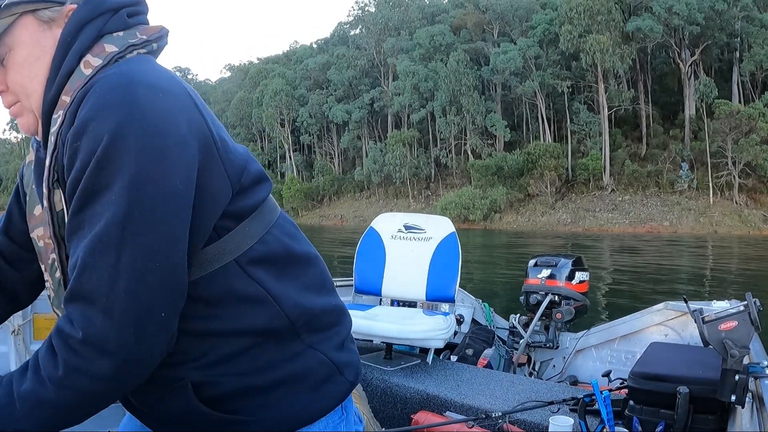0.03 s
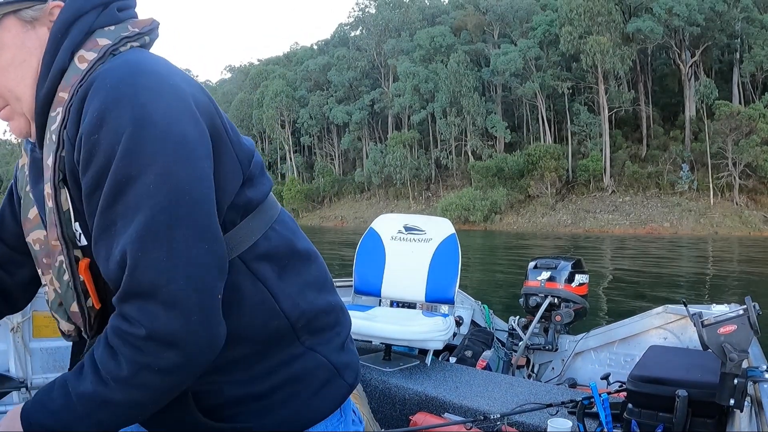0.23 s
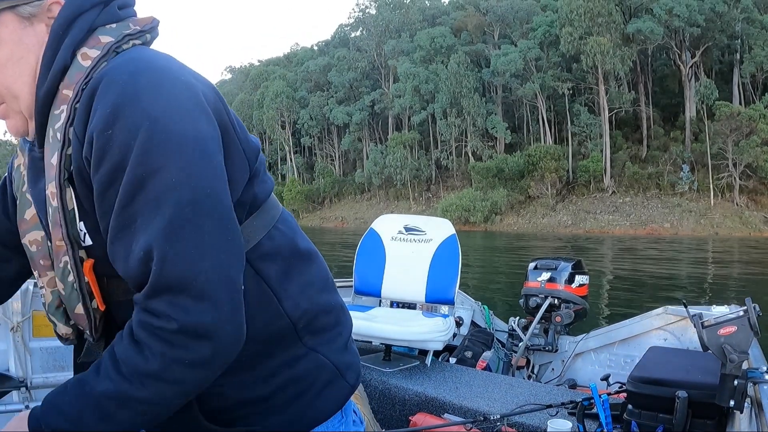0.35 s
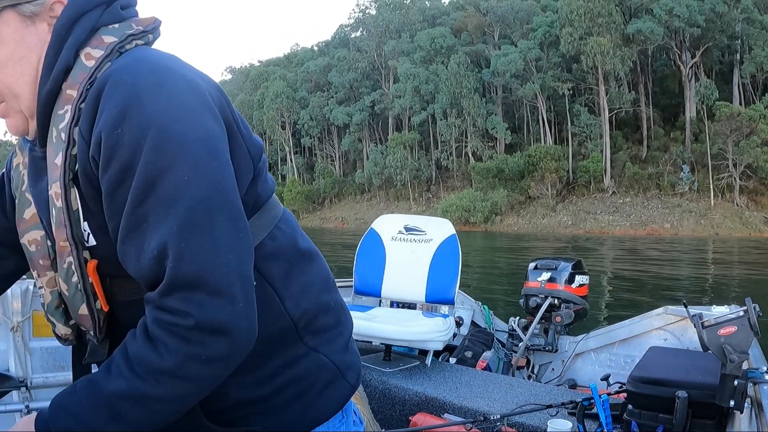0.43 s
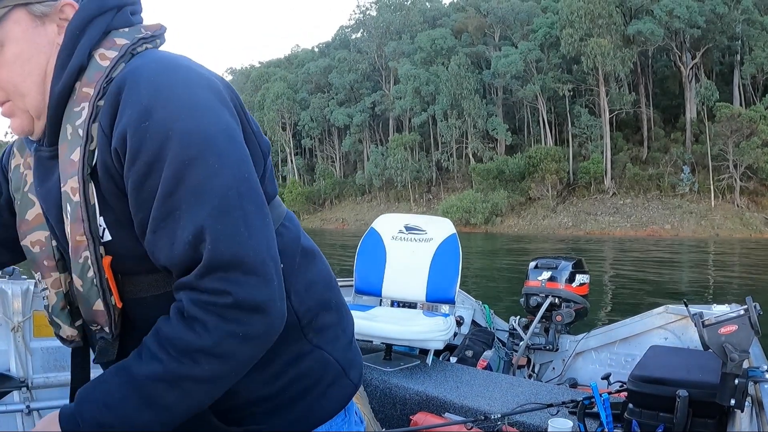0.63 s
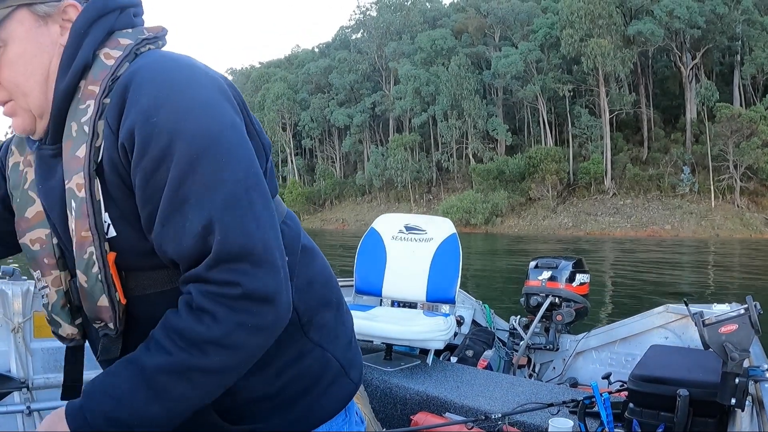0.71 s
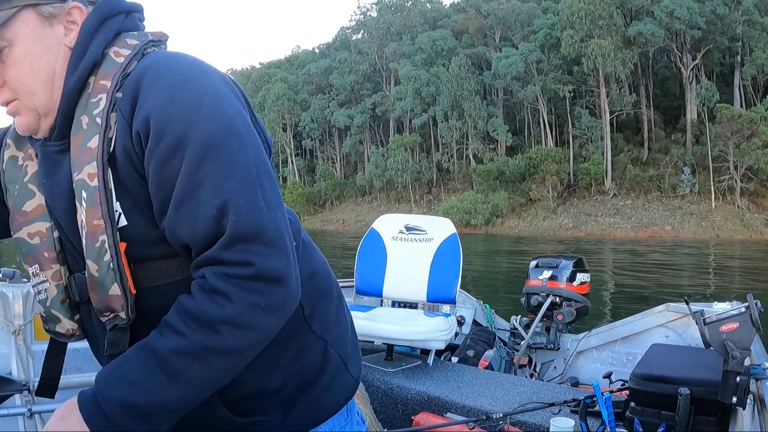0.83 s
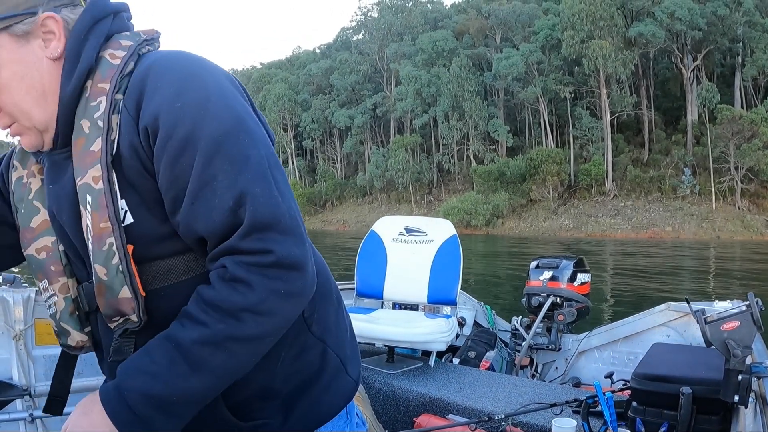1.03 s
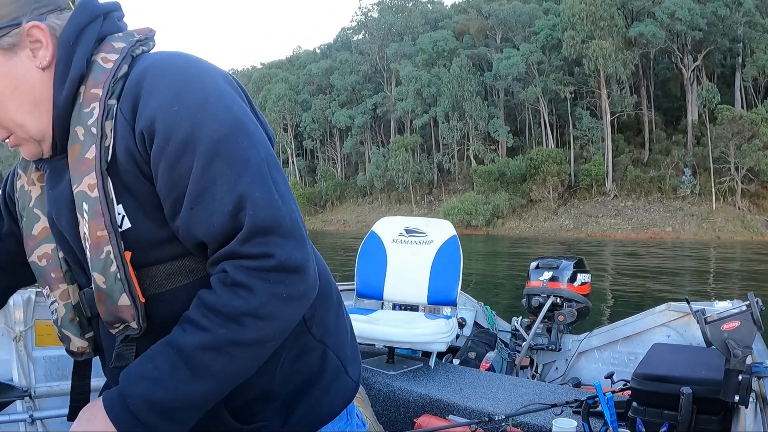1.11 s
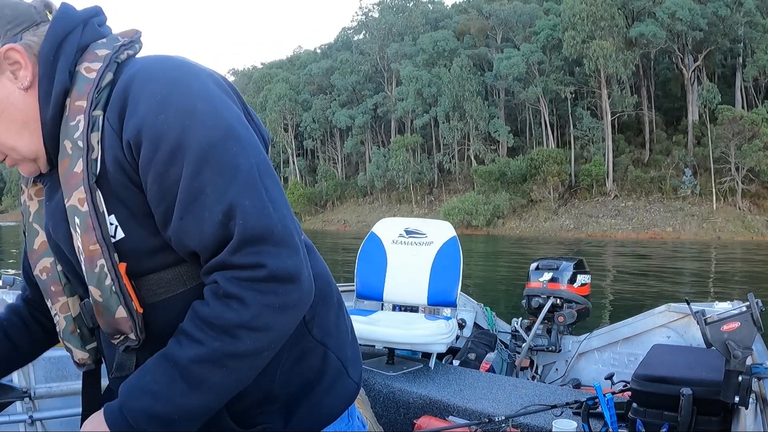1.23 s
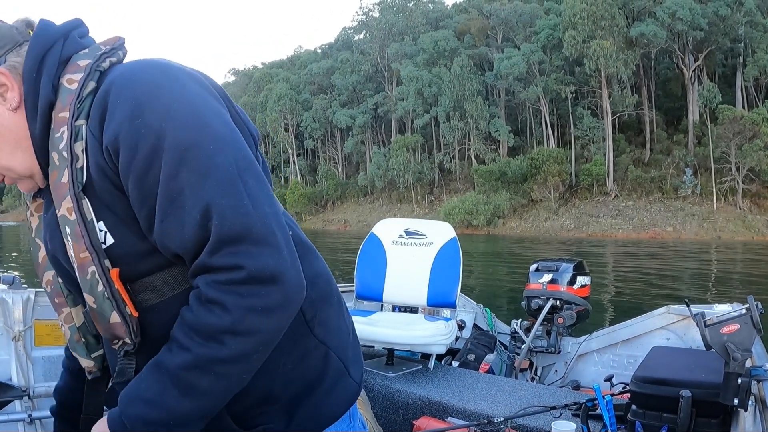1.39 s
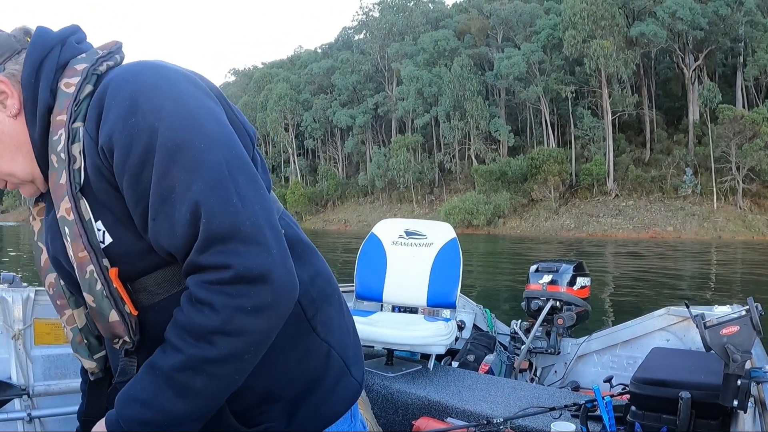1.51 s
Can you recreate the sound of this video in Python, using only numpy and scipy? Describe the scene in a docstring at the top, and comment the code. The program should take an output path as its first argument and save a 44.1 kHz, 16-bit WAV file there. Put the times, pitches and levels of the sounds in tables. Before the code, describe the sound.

Heavy gear thuds hard onto a small metal boat, followed by clattering, rubbing and dull knocks

```python
"""Heavy gear lands with one bang on the hull of a small aluminium boat; scuffs and clicks come first.
Lighter knocks and clatter follow: decaying sine modes and shaped noise sound the struck metal and the hull.
Rubbing strokes and scuffs are resonant noise with a rough level; creaks, hull hums and brief rings of
tapped gear are short wavering tones.
Steady coloured noise is the open air over still water; the close microphone overloads on the bang."""
import sys
import numpy as np
from scipy import signal
from scipy.fft import rfft, irfft, next_fast_len
from scipy.io import wavfile
from scipy.ndimage import map_coordinates

SR = 44100
rng = np.random.default_rng(int(sys.argv[2]) if len(sys.argv) > 2 else 0)


def generate_wav(sig):
    """Save sig (samples, or channels by samples) to the path in sys.argv[1] as 16-bit PCM at SR."""
    pcm = np.round(np.clip(np.atleast_2d(sig).T, -1, 1) * 32767).astype(np.int16)
    wavfile.write(sys.argv[1], SR, pcm)


N = 68355
T = np.arange(N) / SR  # seconds

# Spectrum of hard, light contacts. Each row: frequency in Hz, relative level in dB.
CLICK_COLOUR = [(60, -36.5), (200, 0), (500, 3.5), (1500, 0.5), (3000, -1.5), (4500, -7), (6500, -15),
                (8800, -30.5), (11500, -19), (13500, -45.5), (16000, -67.5)]
# Spectrum of dull blows on sheet metal. Each row: frequency in Hz, relative level in dB.
KNOCK_COLOUR = [(30, -58), (70, -15.5), (130, -23), (220, -2.5), (400, -6.5), (700, -11), (1100, -21),
                (2500, -36), (6000, -44.5), (12000, -99)]


def amp(db):
    """Level to amplitude: 20 dB is a factor of ten."""
    return 10 ** (np.asarray(db) / 20)


def unit(x):
    """Normalisation to unit effective (rms) value."""
    return x / np.sqrt(np.mean(x ** 2) + 1e-20)


def add(out, start_s, x):
    """Superposition: sounds add linearly from their start times on."""
    i = max(round(start_s * SR), 0)
    out[i:i + len(x)] += x[:N - i]


def wobble(rate):
    """Slow random modulation: a smooth curve through random knots, rate of them a second."""
    knots = rng.standard_normal(4096)
    return map_coordinates(knots, [T * rate], mode="wrap")


def noise(colour, ring_hz=1000, q=1, ring_db=-200, size=N):
    """Spectral shaping: noise of rms 1 takes a colour and, if wanted, the peak of one resonance."""
    f = np.fft.rfftfreq(size, 1 / SR) + 1  # the 1 Hz offset keeps the logarithm finite
    hz, db = np.transpose(colour)
    gain = amp(np.interp(np.log(f), np.log(hz), db))
    detuning = q * (f / ring_hz - ring_hz / f)
    gain = gain * np.sqrt(1 + amp(ring_db) ** 2 / (1 + detuning ** 2))
    return unit(irfft(rfft(rng.standard_normal(size)) * gain, size))


def fade(t60, attack, size=N):
    """Exponential damping: a quick rise, then a fall of 60 dB in t60 seconds."""
    t = T[:size]
    return amp(-60 * t / t60) * (1 - np.exp(-t / attack))


def ring(modes, attack, scatter_db, size=24000):
    """Modal superposition: damped sines, whose levels scatter from blow to blow."""
    out = np.zeros(size)
    for hz, db, t60 in modes:
        level = amp(db + scatter_db * rng.standard_normal())
        out += level * fade(t60, attack, size=size) * np.sin(2 * np.pi * hz * T[:size])
    return out


def open_air():
    """Broadband background: coloured noise whose level drifts slowly."""
    # Spectrum of the open air. Each row: frequency in Hz, relative level in dB.
    air_colour = [(20, -47.5), (60, -5.5), (120, 1.5), (250, -1.5), (500, -2), (1000, -3), (1500, -6),
                  (2200, -4), (3200, -15), (4200, -18.5), (6000, -27), (8500, -47), (12000, -37),
                  (14000, -83.5)]
    return amp(-48 + 0.74 * wobble(3.8)) * noise(air_colour)


def rubbing():
    """Sliding friction: fine random grains excite a resonance, with a treble edge and a faint whistle."""
    # Long rubbing strokes. Each row: start in seconds, end in seconds, attack in seconds, release in seconds,
    # level in dB, resonance in Hz, treble edge in Hz, whistle level in dB relative to the hiss.
    strokes = [(-.02, .24, 0.082, 0.032, -50.5, 1724, 7550, -24.5),
               (0.542, 1.112, 0.26, 0.074, -42, 2250, 5580, -47),
               (1.083, 1.263, 0.021, 0.027, -55, 3160, 5950, -24),
               (1.197, 1.652, 0.071, 0.17, -41.5, 3550, 4800, -29.5)]
    # Spectrum of the rubbing hiss. Each row: frequency in Hz, relative level in dB.
    rub_colour = [(60, -33.5), (130, -21), (230, 2), (400, 6), (600, 8.5), (1000, -1.5), (1600, -4.5),
                  (2600, 0.5), (3500, -1.5), (4400, -4), (5500, -9.5), (7000, -14), (8200, -23.5),
                  (9000, -57), (10000, -28.5), (12000, -27.5), (13500, -47)]
    grain_db, grains_per_s, waver_db = 1.7, 260, 0.7
    whistle_hz, whistle_width_hz = 7300, 130
    out, f = np.zeros(N), np.fft.rfftfreq(N, 1 / SR)
    whistle_band = np.exp(-.5 * ((f - whistle_hz) / whistle_width_hz) ** 2)
    for start, end, attack, release, db, hz, edge_hz, whistle_db in strokes:
        speed = np.clip(np.minimum((T - start) / attack, (end - T) / release), 0, 1)
        grain = unit(amp(grain_db * wobble(grains_per_s) + waver_db * wobble(18.3)))
        # a 6 dB step down, spread over 300 Hz
        edge = amp(-6 * np.clip((f - edge_hz) / 300, 0, 1))
        hiss = noise(rub_colour, hz, q=24, ring_db=8.5)
        hiss = unit(irfft(rfft(hiss) * edge, N))
        whistle = unit(irfft(rfft(rng.standard_normal(N)) * whistle_band, N))
        out += amp(db) * speed ** 0.76 * grain * (hiss + amp(whistle_db) * whistle)
    return out


def scuffs():
    """Resonant friction: gear drags a short way, catching and squeaking in a narrow band."""
    # Short scuffs. Each row: start in seconds, length in seconds, level in dB, squeak in Hz.
    scuff_rows = [(-.01, .03, -43.5, 1920), (0.029, 0.041, -43.5, 1800), (0.102, 0.043, -36, 1910),
                  (0.115, 0.038, -37.5, 3260), (0.138, 0.051, -44, 2220), (1.33, 0.024, -47, 5360),
                  (1.362, 0.067, -44.5, 3580)]
    out = np.zeros(N)
    for start_s, length, db, hz in scuff_rows:
        swell = np.abs(np.sin(np.pi * np.clip((T - start_s) / length, 0, 1)))
        out += amp(db) * swell * noise(CLICK_COLOUR, hz, q=8, ring_db=16.5)
    roughness = unit(amp(2.1 * wobble(450)))
    return out * roughness


def clatter(size=8192):
    """Contact stiffness: hard contacts crack and ring between the boat's sides, softer ones lose treble."""
    # Sharp clicks of gear. Each row: start in seconds, level in dB, ring in Hz, 60 dB decay time in seconds,
    # treble limit of the contact in Hz.
    clicks = [(0.043, -36, 4430, 0.013, 9000), (0.0982, -35, 1900, 0.025, 5000),
              (0.2095, -20, 2710, 0.024, 7700), (0.2296, -20, 1204, 0.07, 4500),
              (0.2353, -11.5, 1096, 0.022, 4930), (.2365, -17.5, 3280, 0.023, 6940),
              (0.2414, -18.5, 3600, 0.017, 5950), (.2555, -31, 2800, 0.012, 5080),
              (.2805, -23.5, 2130, 0.025, 6950), (0.3576, -26.5, 2740, 0.013, 6040),
              (0.3627, -23, 1320, 0.022, 6460), (0.379, -32, 2780, 0.036, 8900),
              (.400, -36, 2980, 0.083, 9800), (.433, -29.5, 1630, 0.094, 4870),
              (0.57, -40.5, 5100, 0.028, 12100), (.627, -34, 1366, 0.018, 5860),
              (0.687, -31.5, 1530, 0.027, 2000), (.701, -29, 1550, 0.016, 2020),
              (.836, -31.5, 2130, 0.016, 3000), (0.898, -32.5, 850, 0.019, 2000),
              (1.024, -31, 2270, 0.029, 3000), (1.072, -26, 1330, 0.019, 2200),
              (1.189, -41.5, 3000, 0.076, 4000), (1.2163, -26, 3220, 0.016, 5770),
              (1.226, -27.5, 3080, 0.019, 4400), (1.4244, -27, 2600, 0.019, 4800),
              (1.432, -34.5, 980, 0.12, 2500)]
    out = np.zeros(N)
    for start_s, db, hz, t60, limit_hz in clicks:
        tail = amp(-20.5) * fade(0.22, 0.014, size=size)
        envelope = fade(t60, 0.00055, size=size) + tail
        softness = signal.butter(2, limit_hz, fs=SR, output="sos")
        crack = noise(CLICK_COLOUR, hz, q=3.3, ring_db=7, size=size)
        add(out, start_s, amp(db) * envelope * unit(signal.sosfilt(softness, crack)))
    return out


def hull_ring(spot_hz, size=24000):
    """Modal coupling: wavering hull modes build up, weakly driven if below the pitch of the struck spot."""
    # Long ring of the whole hull. Each row: frequency in Hz, relative level in dB, 60 dB decay time in seconds.
    hull_modes = [(64.6, 10.5, 0.15), (101.2, -3, 0.96), (137, -11.5, 0.98), (170.4, 4, 0.51),
                  (195, -6, 0.93), (242.8, -9.5, 0.73), (258, 2, 0.49), (339.4, -2.5, 0.49),
                  (416.5, -12.5, 0.71), (525, -9, 0.35), (565.4, -11.5, 0.49), (724, -18.5, 0.21)]
    bass_rolloff = 0.7  # small high-pitched spots hardly move the low modes
    blur_rad, blur_per_s = 1.1, 70  # random phase steps under the shifting load
    t = T[:size]
    out = np.zeros(size)
    for hz, db, t60 in hull_modes:
        drift = np.interp(t * blur_per_s, np.arange(64), np.cumsum(rng.standard_normal(64)))
        drive = min(hz / spot_hz, 1) ** bass_rolloff * rng.choice([-1, 1])
        level = drive * amp(db + 2.8 * rng.standard_normal())
        out += level * fade(t60, 0.0025, size=size) * np.sin(2 * np.pi * hz * t + blur_rad * drift)
    return out


def knocks(size=24000):
    """Impact excitation: each knock rings its spot, the hull and loose gear; heavy ones thump the boat."""
    # Dull knocks on the hull. Each row: start in seconds, level in dB, pitch of the struck spot in Hz,
    # its 60 dB decay time in seconds, deep thump level in dB, rattle level in dB relative to the knock.
    knock_rows = [(.117, -31, 218.5, .12, -53, -6), (0.165, -29, 419, 0.11, -70, -11.5),
                  (0.214, -12.5, 250, 0.044, -58, -10), (0.2311, -6, 446, 0.023, -38.5, -17.5),
                  (0.256, -14, 160, 0.046, -44, -22), (0.284, -19, 172, 0.05, -45.5, -7.5),
                  (.301, -13.5, 281, 0.063, -41, -10), (.322, -20, 342, 0.077, -51, -10.5),
                  (.362, -28, 140, .07, -42, -17), (0.379, -23.5, 207, 0.094, -45, -12.5),
                  (0.404, -20, 240, 0.08, -30, -23), (0.429, -14.5, 396, 0.033, -42, -15.5),
                  (0.4371, -10, 106, 0.029, -15, -15), (0.478, -27, 276, 0.13, -53, -14),
                  (.53, -32, 116.4, 0.19, -62, -2), (.592, -20, 199, 0.11, -55, -14),
                  (0.5976, -19.5, 265.3, 0.071, -48, -17), (.598, -22.5, 365, 0.063, -41.5, -13.5),
                  (0.628, -26, 596, 0.026, -42, -11), (0.799, -25.5, 224, 0.046, -56, -8.5),
                  (0.812, -28.5, 210.6, 0.15, -70, -14), (0.88, -28, 250, 0.056, -54, -12),
                  (.898, -27.5, 298, 0.083, -64, -8), (.901, -29.5, 530, 0.05, -66, -11),
                  (.994, -35, 675, 0.078, -75, -6.5), (1.029, -28, 212, 0.1, -58, -4),
                  (1.068, -22.5, 218, 0.091, -77, -16), (1.133, -29, 297, 0.045, -68, -10),
                  (1.2165, -28, 451, 0.054, -74, -11), (1.289, -24, 278, 0.052, -44.5, -12.5),
                  (1.326, -32, 570, 0.046, -62, -12), (1.4224, -13, 366, 0.03, -31, -19),
                  (1.455, -33.5, 297, 0.036, -39, -2)]
    # The whole boat thumped. Each row: frequency in Hz, relative level in dB, 60 dB decay time in seconds.
    thump_modes = [(62, -7, .13), (105, 3, .05)]
    # Spectrum of the thump's noise. Each row: frequency in Hz, relative level in dB.
    thump_colour = [(20, -34), (40, -28), (60, -7.5), (100, -2.5), (160, -25.5), (400, -40), (1500, -84),
                    (5000, -120)]
    hull_db, thump_noise_db, scatter_db = -26.5, -10, 1.5
    rise_cycles, thump_attack_s = 0.55, 0.0016
    out = np.zeros(N)
    for start_s, db, hz, t60, thump_db, rattle_db in knock_rows:
        spot = ring([(hz, 0, t60)], rise_cycles / hz, scatter_db)
        rattle = noise(KNOCK_COLOUR, hz, q=0.69, ring_db=18, size=size) * fade(0.16, 0.003, size=size)
        add(out, start_s, amp(db) * (spot + amp(hull_db) * hull_ring(hz) + amp(rattle_db) * rattle))
        thump = ring(thump_modes, thump_attack_s, scatter_db)
        thump_noise = noise(thump_colour, size=size) * fade(0.2, thump_attack_s, size=size)
        add(out, start_s, amp(thump_db) * (thump + amp(thump_noise_db) * thump_noise))
    return out


def landing(size=24000):
    """Impulsive loading: heavy gear touches, then lands; the floor booms and the boat shakes."""
    # The heavy landing. Each row: start in seconds, boom level in dB.
    blows = [(0.231, -21.5), (0.2364, -0.5)]
    # Boom of the struck floor panel. Each row: frequency in Hz, relative level in dB,
    # 60 dB decay time in seconds.
    boom_modes = [(85.4, -8.5, 0.13), (165.2, -14.5, 0.26), (241, 5, 0.072), (408, -11, 0.13),
                  (458, -22, 0.12), (656, -21.5, 0.17)]
    shake_db, hull_db = -23, -23.5
    out = np.zeros(N)
    for start_s, boom_db in blows:
        # the loose rumble of the boat
        shake = noise(KNOCK_COLOUR, size=size) * fade(0.42, 0.002, size=size)
        hull = hull_ring(boom_modes[0][0])
        boom = ring(boom_modes, attack=0.0013, scatter_db=1.26)
        add(out, start_s, amp(boom_db) * (amp(shake_db) * shake + amp(hull_db) * hull - boom))
    return out


def gear_taps():
    """Free vibration: contacts ring the modes of the hard gear, low-passed by the softness of the contact."""
    # Contacts that ring the gear. Each row: start in seconds, level in dB, treble limit in Hz.
    taps = [(.2318, -9.5, 4000), (.2352, -4, 9000), (1.0715, -28, 2900)]
    # Ring of the hard gear. Each row: frequency in Hz, relative level in dB, 60 dB decay time in seconds.
    gear_modes = [(932, -18, .08), (1160, -20, .06), (1626, -11, .07), (1690, -17, .04), (1832, -17, .07),
                  (2130, -22, .04), (2615, -15, .075), (2936, -19, .065), (3135, -24, .07),
                  (3560, -25, .06), (3900, -22, .03)]
    out = np.zeros(N)
    for start_s, db, limit_hz in taps:
        softness = signal.butter(2, limit_hz, fs=SR, output="sos")
        gear = ring(gear_modes, attack=0.00056, scatter_db=1)
        add(out, start_s, amp(db) * signal.sosfilt(softness, gear))
    return out


def wavering_tones():
    """Unsteady tones: creaking metal, humming hull and tapped gear give short, slightly gliding notes."""
    # Short wavering tones: metal creaks, low hull hums and brief rings of tapped gear. Each row:
    # start in seconds, length in seconds, level in dB, start of the glide in Hz, end of the glide in Hz.
    tone_rows = [(0.425, 0.027, -24.5, 490, 683), (0.45, 0.028, -41, 837, 765),
                 (0.476, 0.035, -35.5, 747, 705), (0.568, 0.023, -36, 650, 554),
                 (0.569, 0.033, -44, 1055, 1030), (0.589, 0.021, -45, 1065, 1390),
                 (0.774, 0.089, -36, 218, 207.7), (0.886, 0.12, -38, 210, 184),
                 (1.071, 0.061, -38.5, 196.5, 188), (1.056, .022, -35, 1570, 1630),
                 (1.064, 0.011, -33, 1830, 1800), (1.062, 0.036, -41.5, 2710, 2606)]
    jitter_hz = 35
    out = np.zeros(N)
    for start_s, length, db, start_hz, end_hz in tone_rows:
        progress = np.clip((T - start_s) / length, 0, 1)
        hz = start_hz + (end_hz - start_hz) * progress + jitter_hz * wobble(330)
        tone = np.sin(2 * np.pi * np.cumsum(hz) / SR)
        out += amp(db + 2.5 * wobble(122)) * np.sin(np.pi * progress) * tone
    return out


def scene():
    """Linear superposition: all handling sounds over a quiet outdoor background."""
    friction = rubbing() + scuffs()
    impacts = clatter() + knocks() + landing() + gear_taps()
    return (open_air() + friction + impacts + wavering_tones())[None]


def record(dry):
    """Band limiting and saturation: deep bass is cut, peaks flatten at full scale, the top is removed."""
    low_cut_hz, top_hz, hardness = 42, 16000, 30
    low_cut = signal.butter(3, low_cut_hz, "high", fs=SR, output="sos")
    x = signal.sosfilt(low_cut, dry)
    clipped = x / (1 + np.abs(x) ** hardness) ** (1 / hardness)
    m = next_fast_len(N + 4096)  # padding keeps the filter from wrapping round
    passband = np.fft.rfftfreq(m, 1 / SR) < top_hz
    return irfft(rfft(clipped, m) * passband, m)[..., :N]


dry = scene()
out = record(dry)
generate_wav(out)
```